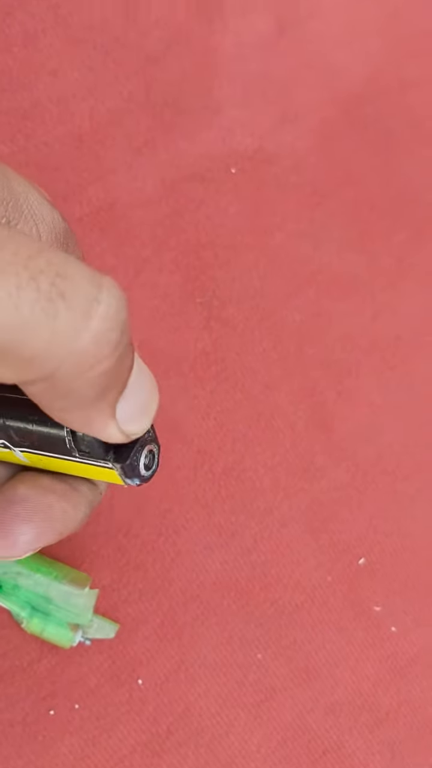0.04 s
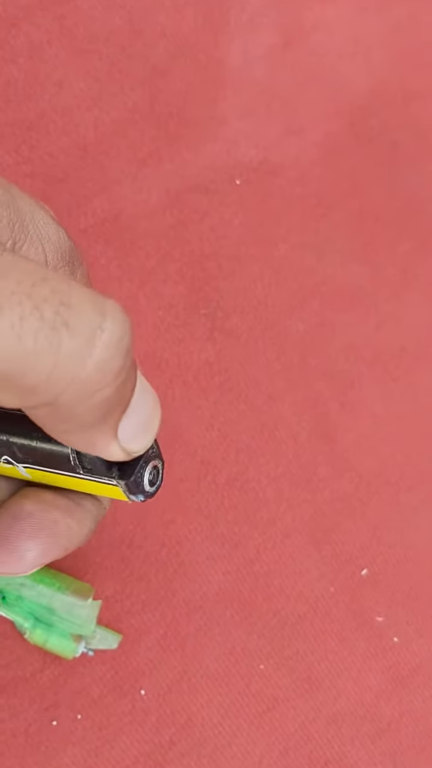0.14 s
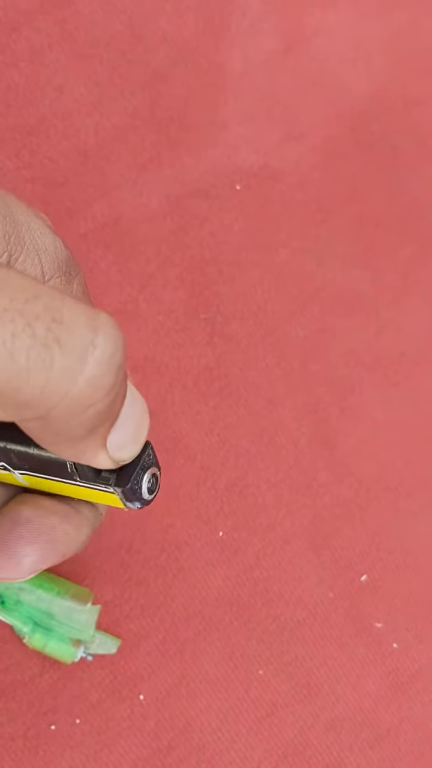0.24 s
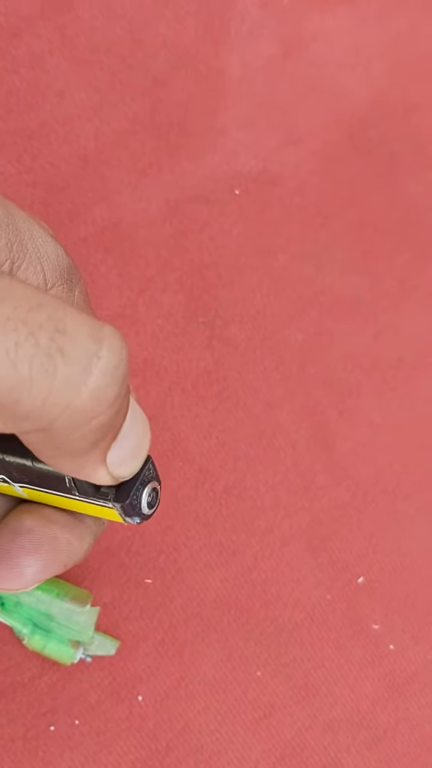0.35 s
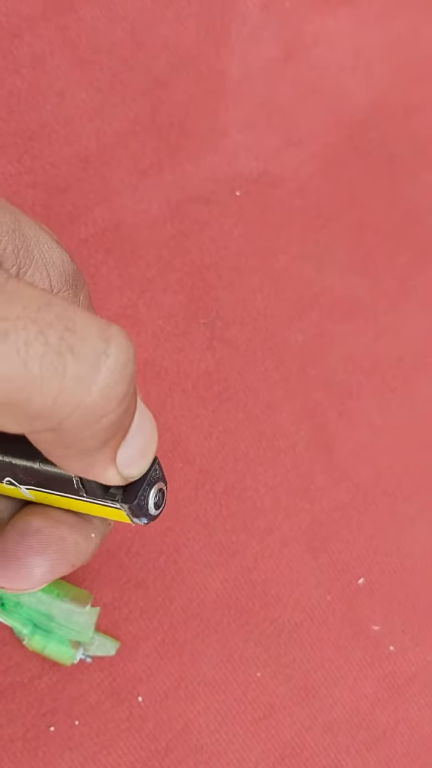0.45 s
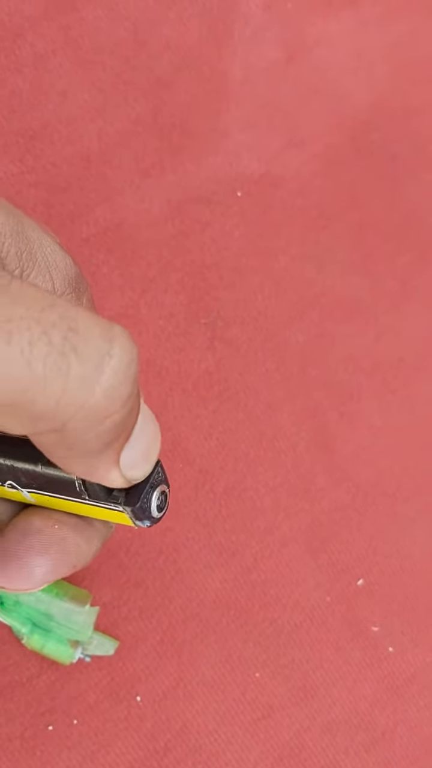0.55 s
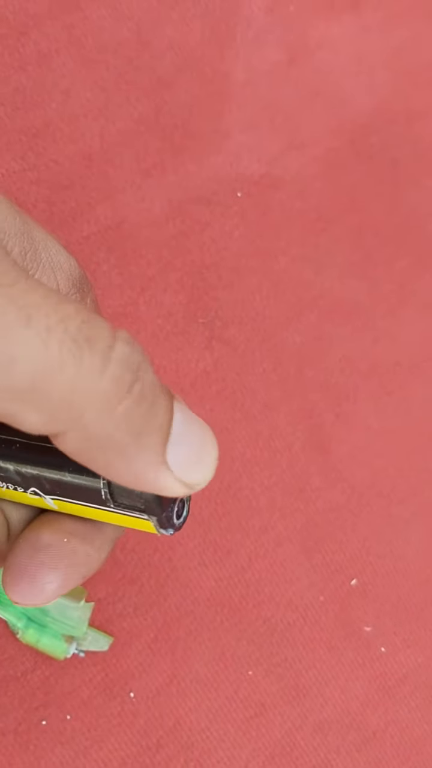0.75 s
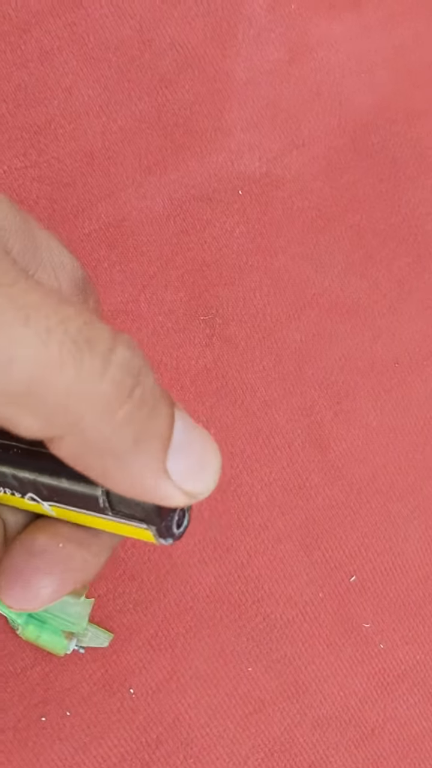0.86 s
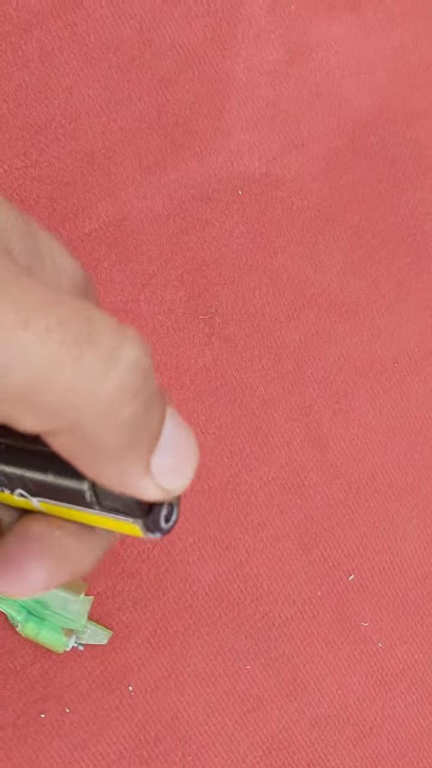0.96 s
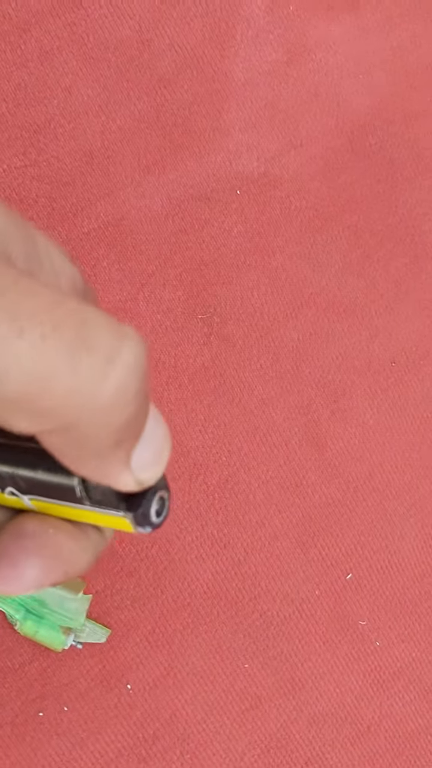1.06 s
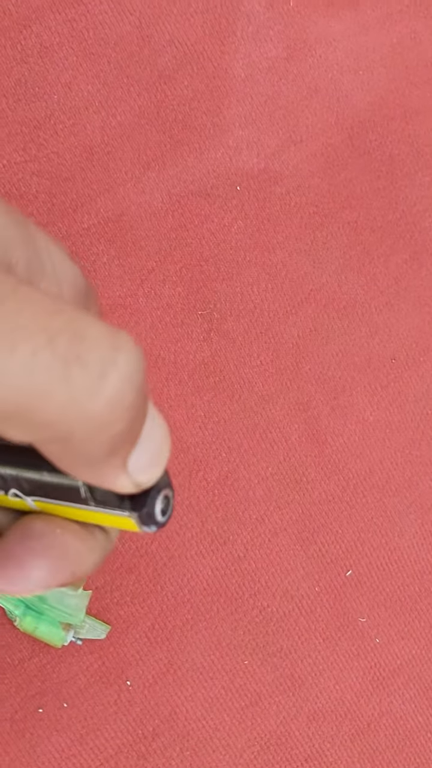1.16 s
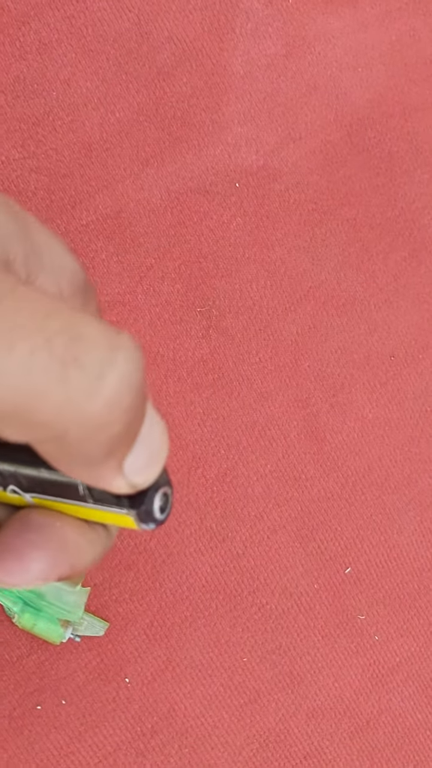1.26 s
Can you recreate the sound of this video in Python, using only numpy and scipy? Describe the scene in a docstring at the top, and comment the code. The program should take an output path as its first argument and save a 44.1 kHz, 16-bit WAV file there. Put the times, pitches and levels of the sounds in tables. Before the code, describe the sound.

A small metal object snaps shut, then clicks open more softly, with faint finger rubbing.

```python
"""A low hum in a quiet room, and fingers rubbing faintly on a small metal object close to the microphone. The
object snaps shut: a quick cluster of contacts rings the case, the hand takes a dull thump and a few lighter
contacts follow. The case ticks in the grip, and a lighter release leaves the spring singing. Snap and release
both echo briefly off the walls."""
import sys
import numpy as np
from scipy import signal
from scipy.fft import rfft, irfft
from scipy.io import wavfile

SR = 44100
rng = np.random.default_rng(int(sys.argv[2]) if len(sys.argv) > 2 else 0)


def pcm_store(signal):
    """Save signal as 16-bit PCM."""
    levels = np.round(np.clip(np.atleast_2d(signal), -1, 1) * 32767)
    wavfile.write(sys.argv[1], SR, levels.astype(np.int16).T)


N = 57330
T = np.arange(N) / SR
SHORT_T = T[:8192]
HZ = np.fft.rfftfreq(N, 1 / SR)


def amp(db):
    """Decibels to gain."""
    return 10 ** (np.asarray(db) / 20)


def unit(x):
    """Scales to rms 1."""
    return x / np.sqrt(np.mean(x ** 2) + 1e-20)


def curve(points, hz):
    """Interpolates on a log-frequency axis."""
    knots_hz, values = np.transpose(points)
    return np.interp(np.log(hz + 1), np.log(knots_hz + 1), values)


def envelope(points):
    """Gain over time from (s, dB) points."""
    return amp(np.interp(T, *np.transpose(points)))


def colour(x, points):
    """Minimum-phase filter from (Hz, dB) points."""
    size = 2 * len(x)
    log_gain = np.log(amp(curve(points, abs(np.fft.fftfreq(size, 1 / SR)))))
    response = np.exp(np.conj(signal.hilbert(log_gain)))[:len(x) + 1]
    return irfft(rfft(x, size) * response)[:len(x)]


def delay(x, lag_s):
    """Fractional-sample delay."""
    size = 2 * x.shape[-1]
    shift = np.exp(-2j * np.pi * np.fft.rfftfreq(size, 1 / SR) * lag_s)
    return irfft(rfft(x, size) * shift)[..., :x.shape[-1]]


def place(x, start_s):
    """Puts a short sound on the time line."""
    out = np.zeros(x.shape[:-1] + (N,))
    part = out[..., max(round(start_s * SR), 0):][..., :x.shape[-1]]
    part += x[..., :part.shape[-1]]
    return out


def noise(gain):
    """Noise with the given gain per frequency, rms 1."""
    return unit(irfft(rfft(rng.standard_normal(N)) * gain, N))


def sine(hz):
    """Sine that follows a frequency track."""
    return np.sin(2 * np.pi * np.cumsum(hz) / SR)


def ring(modes):
    """Dying sines of a struck object."""
    return sum(amp(db - 60 * SHORT_T / t60_s) * np.sin(2 * np.pi * hz * SHORT_T)
               for hz, db, t60_s in modes)


def swell(middle_s, sigma_s, db, hz, sigma_octaves):
    """A band of noise that rises and falls."""
    band = noise(np.exp(-.5 * (np.log2((HZ + 1) / hz) / sigma_octaves) ** 2))
    return amp(db) * np.exp(-.5 * ((T - middle_s) / sigma_s) ** 2) * band


# Room noise spectrum. Each row: frequency in Hz, relative density in dB.
AIR_SPECTRUM = [(20, -21.5), (45, -10), (75, -0.5), (120, -6), (200, -6), (290, -6.5), (420, -14.5),
                (580, -22.5), (820, -22), (1150, -32), (2400, -33.5), (4000, -41.5), (7800, -52),
                (12000, -41.5), (16000, -43)]
# Likeness of the channels. Each row: frequency in Hz, correlation.
AIR_CORRELATION = [(50, 0.86), (300, 0.33), (1000, 0.2), (4000, 0.15), (15000, 0.24)]
# Balance. Each row: frequency in Hz, left over right in dB.
AIR_PAN = [(60, 1.5), (130, 2), (290, -4), (1000, -1.5), (15000, -5)]
# Room noise level. Each row: time in seconds, level in dB.
AIR_LEVEL = [(0, -59), (.2, -57.5), (.4, -60), (.58, -63.5), (.75, -59), (.95, -61.5), (1.3, -61.5)]
def room_noise():
    """Low noise, most alike left and right in the bass."""
    correlation = np.clip(curve(AIR_CORRELATION, HZ), -1, 1)
    left, independent = rfft(rng.standard_normal((2, N)))
    right = correlation * left + np.sqrt(1 - correlation ** 2) * independent
    pan = amp(curve(AIR_PAN, HZ) / 2)
    spectra = np.array([left * pan, right / pan]) * amp(curve(AIR_SPECTRUM, HZ))
    return envelope(AIR_LEVEL) * unit(irfft(spectra, N))


# Hum lines. Each row: frequency in Hz, base level in dB, rms waver in Hz.
HUM_LINES = [(78.07, -68, 12), (150.7, -69, 2.2), (267.4, -69, 7), (302.6, -69.5, 5.6)]
# Shared gain of those lines. Each row: time in seconds, gain in dB.
HUM_GAIN = [(0, 5.5), (.16, 6.5), (.33, 1.5), (.55, -4), (.76, 3), (1.0, -6.5), (1.3, 0)]
# Mains line, the strongest. Each row: time in seconds, left level in dB.
MAINS_LEVEL = [(0, -73.5), (.1, -48.5), (.38, -55), (.5, -72.5), (.62, -60.5), (.73, -51.5), (.88, -58.5),
               (.98, -71.5), (1.3, -56.5)]
def hum(mains_hz=99.85, mains_waver_hz=1.5, mains_right_db=-8, flutter_db=2.5):
    """Mains hum and four weaker lines waver in pitch and level."""
    slow = np.exp(-(HZ / 12) ** 2)
    lines = sum(amp(db + flutter_db * noise(slow)) * unit(sine(hz + waver_hz * noise(slow)))
                for hz, db, waver_hz in HUM_LINES)
    mains = envelope(MAINS_LEVEL) * unit(sine(mains_hz + mains_waver_hz * noise(slow)))
    return envelope(HUM_GAIN) * lines + np.array([mains, amp(mains_right_db) * mains])


# Finger rubs. Each row: middle and sigma in seconds, level in dB, centre in Hz, sigma in octaves.
RUBS = [(-0.012, 0.076, -58, 3430, 0.439), (0.185, .07, -72, 4140, .3), (0.554, 0.031, -76.5, 4994, 0.075),
        (0.634, 0.048, -71.5, 4140, 0.15), (0.733, 0.062, -70.5, 4470, 0.383),
        (0.864, 0.091, -72, 4158, 0.27), (1.025, 0.071, -73, 4840, 0.37), (1.167, 0.0384, -65, 3314, 0.309),
        (1.234, 0.2, -77, 4620, 0.4)]
def finger_rubs(grain_db=1.5, grain_hz=200):
    """Skin slides on the case: soft swells of grainy hiss."""
    grain = amp(grain_db * noise(1 / (1 + (HZ / grain_hz) ** 2)))
    return grain * np.array([sum(swell(*row) for row in RUBS) for port in range(2)])


# Blip. One row: start and length in seconds, level in dB, frequency and its rise in Hz.
BLIP = (.01, 0.0016, -51.5, 275, 22)
def low_blip():
    """A faint blip, under one cycle of a low tone."""
    start_s, length_s, db, hz, rise_hz = BLIP
    arch = np.sin(np.pi * np.clip((T - start_s) / length_s, 0, 1))
    return amp(db) * arch * sine(hz + rise_hz * arch)


# Case modes. Each row: frequency in Hz, level in dB, T60 in seconds.
CASE_MODES = [(1770, -36, 0.023), (2760, -31.5, 0.0094), (3415, -26.5, 0.022), (4243, -21.5, .0125),
              (5450, -15, 0.0023), (5622, -27.5, 0.022), (6100, -33.5, .015), (6690, -45, 0.015),
              (8000, -34, 0.006), (9184, -16.5, 0.0018), (9940, -38, 0.027), (12600, -35.5, .01),
              (15900, -33.5, .006)]
def contact(tone, impulse_db=-6.5, grit_db=-17.5, grit_decay_s=.0005):
    """One contact: a sharp impulse, a little grit and a ring of the case."""
    impulse = amp(impulse_db) * (SHORT_T == 0)
    grit = amp(grit_db) * np.exp(-SHORT_T / grit_decay_s) * rng.standard_normal(len(SHORT_T))
    return colour(impulse + ring(CASE_MODES) + grit, tone)


def click(contacts, tone):
    """A quick cluster of contacts, each with its own grit."""
    return sum(place(amp(db) * contact(tone), start_s) for start_s, db in contacts)


# Snap contacts. Each row: start in seconds, gain in dB.
SNAP_CONTACTS = [(.2267, -38), (.22995, -16), (.2311, -12.5), (.23154, 3), (.2327, -9.5), (.2341, -7)]
# Further snap contacts, just after the first cluster, with the same case ring and colour. Each row: start in
# seconds, gain in dB.
LATER_SNAP_CONTACTS = [(0.245, -18.5), (0.2483, -19), (0.2639, -25.5)]
# Colour of both. Each row: frequency in Hz, gain in dB.
SNAP_TONE = [(700, -7.5), (1200, 1), (1550, -4), (2050, 3), (2700, -9.5), (4200, 1.5), (5600, 6), (7200, 1),
             (10000, 1), (12500, 6.5), (16000, 10.5)]
def snap():
    """The case shuts hard, and a few lighter contacts follow with the same ring."""
    return click(SNAP_CONTACTS + LATER_SNAP_CONTACTS, SNAP_TONE)


# Push at the left, then right port. Each row: gain in dB, bass roll-off in Hz.
PUSH_PORTS = [(-7.5, 55), (-12.5, 210)]
# Thump modes. Each row: frequency in Hz, level in dB, T60 in seconds.
THUMP_MODES = [(66, -27.5, .13), (100.7, -19.5, .14)]
def thump(start_s=.2313, rise_s=.00067, roundness=.89, ring_lag_s=.0032, ring_right_db=-22.5):
    """The snap jolts the hand: one short push and a low ring, mostly on the left."""
    age = SHORT_T / rise_s
    pulse = (age * np.exp(1 - age)) ** roundness
    push = np.array([amp(db) * signal.lfilter(*signal.butter(2, hz, "highpass", fs=SR), pulse)
                     for db, hz in PUSH_PORTS])
    low_ring = delay(ring(THUMP_MODES), ring_lag_s)
    return place(np.array([low_ring, amp(ring_right_db) * low_ring]) - push, start_s)


# Wall reflections. Each row: delay in seconds, gain in dB.
ECHOES = [(.0062, -25.5), (.0105, -22.5), (.0138, -22.5), (.0168, -23), (.0325, -29.5)]
# Tail decay. Each row: frequency in Hz, T60 in seconds.
ROOM_T60 = [(200, 0.36), (2000, .34), (4500, 0.34), (6500, .28), (15000, 0.23)]
def room(x, tail_db=-19, scatter_s=.0013):
    """A few scattered wall reflections and a short diffuse tail."""
    hz, t, spectra = signal.stft(rng.standard_normal((2, N // 2)), SR, nperseg=256)
    decay = amp(-60 * t / curve(ROOM_T60, hz)[:, None])
    tail = signal.istft(spectra * decay, SR, nperseg=256)[1]
    response = place(amp(tail_db) * tail / np.linalg.norm(tail[0]), 0)
    for delay_s, db in ECHOES:
        scatter = rng.standard_normal((2, len(SHORT_T))) * np.exp(-SHORT_T / scatter_s)
        response += place(amp(db) * scatter / np.linalg.norm(scatter[0]), delay_s)
    return signal.fftconvolve(x[None], response, axes=1)[:, :N]


def crack(contacts, tone):
    """The broad crack that a click sends into the room."""
    pulse = colour(1. * (SHORT_T == 0), tone)
    return sum(place(amp(db) * pulse, start_s) for start_s, db in contacts)


# Low swell. One row: middle and sigma in seconds, level in dB, centre in Hz, sigma in octaves.
LOW_SWELL = (.36, .05, -61, 405, .06)
def low_swell():
    """A narrow, low band of noise swells once after the snap."""
    return swell(*LOW_SWELL)


# Grip ticks. Each row: start in seconds, gain in dB, low-pass cutoff in Hz.
TICKS = [(.643, -46, 16060), (0.6626, -36, 7000), (0.72, -53, 8000), (.732, -43, 7000), (0.736, -43, 9000),
         (0.9172, -35.5, 4200), (0.9198, -29, 4200), (0.995, -45, 6160), (1.049, -42, 6500),
         (1.057, -46, 8000), (1.072, -47, 9100)]
# Tick colour. Each row: frequency in Hz, gain in dB.
TICK_TONE = [(100, -26), (1700, 0), (3000, -14), (4300, 9.5), (6000, -2), (9000, -3), (16000, 9)]
def grip_ticks():
    """The case shifts in the grip: faint, scattered ticks, the loudest ones dullest."""
    tick = contact(TICK_TONE)
    return sum(place(amp(db) * signal.lfilter(*signal.butter(2, hz, fs=SR), tick), start_s)
               for start_s, db, hz in TICKS)


# Release contacts. Each row: start in seconds, gain in dB.
RELEASE_CONTACTS = [(.7532, -35), (.758, -26), (.75945, -21), (.761, -27), (.7615, -7), (.7628, -46),
                    (.76405, -17.5), (.766, -42)]
# Release colour. Each row: frequency in Hz, gain in dB.
RELEASE_TONE = [(200, -26), (550, -16), (850, -4.5), (1200, 2.5), (1520, -9), (1750, 7.5), (2250, -24.5),
                (2750, -1), (3100, -13.5), (4200, 2), (5400, 4.5), (7200, -5.5), (10000, 2), (16000, 5.5)]
# Spring modes. Each row: frequency in Hz, level in dB, T60 in seconds.
SPRING_MODES = [(6820, -54.5, 0.071), (7350, -58, 0.09), (5670, -54, 0.033)]
def release():
    """A lighter click whose hardest contact sets the spring singing."""
    hardest_s = max(RELEASE_CONTACTS, key=lambda row: row[1])[0]
    return click(RELEASE_CONTACTS, RELEASE_TONE) + place(ring(SPRING_MODES), hardest_s)


# What each microphone port hears of the case. Each row: frequency in Hz, gain in dB.
LEFT_PORT = [(1200, -7.5), (3000, -4), (4400, 0.64), (6500, 6.5), (8400, -26.5), (10500, -5), (13000, -7.5),
             (16000, -5.6)]
RIGHT_PORT = [(1200, -8.5), (3000, -5.5), (4400, -1.5), (6500, 6.5), (8400, 4.7), (10500, 5.5), (13000, 0),
              (16000, 2)]
# Colour each click sends into the room. Each row: frequency in Hz, gain in dB.
SNAP_ROOM_TONE = [(200, -9), (1200, -8), (1700, 3.5), (2300, 3), (3100, -2), (4300, 3.5), (6500, 3),
                  (8000, -5), (9500, 0.5), (12000, -0.5), (15500, 0.5)]
RELEASE_ROOM_TONE = [(200, -17), (1700, -4.5), (4200, -2), (6000, -3), (9500, -9.5), (15000, -3.5)]
def scene(right_lag_s=.00009):
    """The clicks reach the two ports directly and by way of the room, over the quieter sounds."""
    case = snap() + release() + grip_ticks()
    direct = np.array([colour(case, LEFT_PORT), delay(colour(case, RIGHT_PORT), right_lag_s)])
    reverb = room(crack(SNAP_CONTACTS, SNAP_ROOM_TONE) + crack(RELEASE_CONTACTS, RELEASE_ROOM_TONE))
    return direct + reverb + thump() + finger_rubs() + room_noise() + hum() + low_swell() + low_blip()


def record(dry, cutoff_hz=16400):
    """A steep low-pass trims the highest treble."""
    lowpass = signal.firwin(151, cutoff_hz, window=("kaiser", 8), fs=SR)
    return signal.oaconvolve(dry, lowpass[None], "same")


dry = scene()
out = record(dry)
pcm_store(out)
```